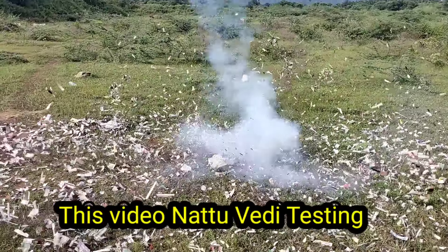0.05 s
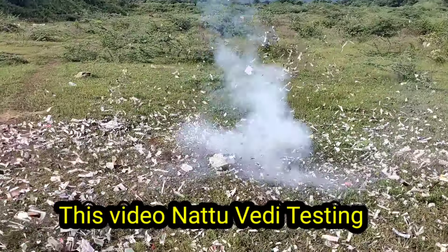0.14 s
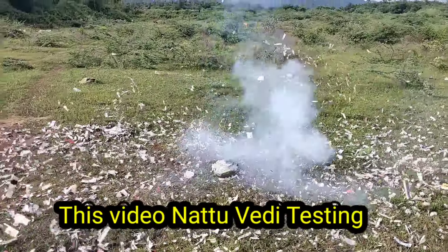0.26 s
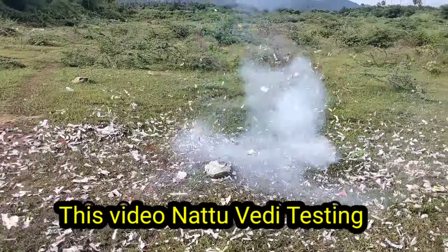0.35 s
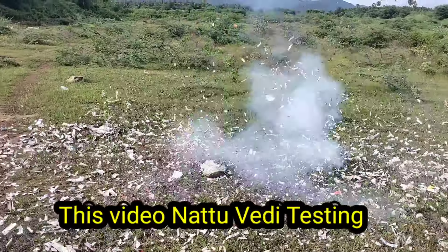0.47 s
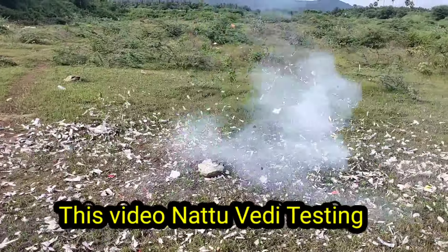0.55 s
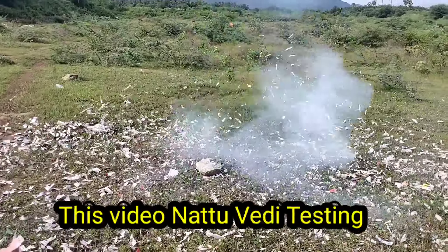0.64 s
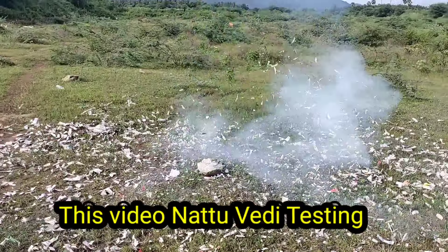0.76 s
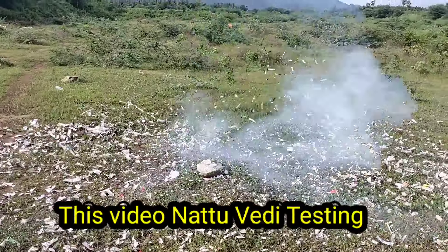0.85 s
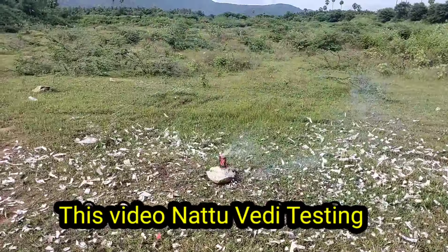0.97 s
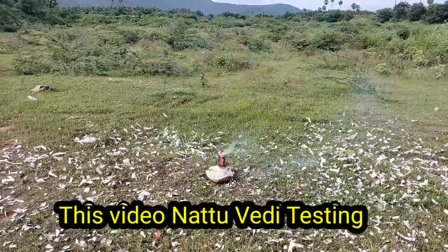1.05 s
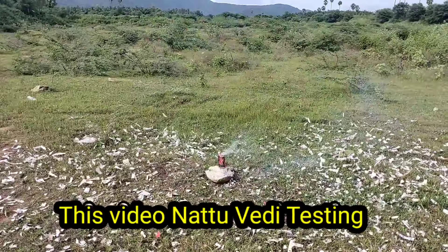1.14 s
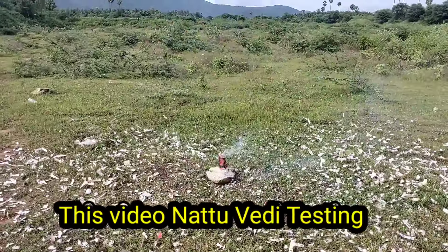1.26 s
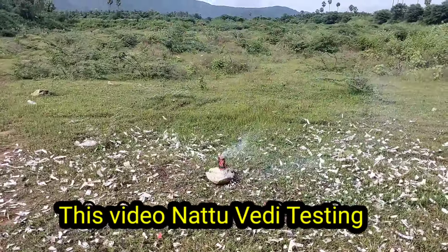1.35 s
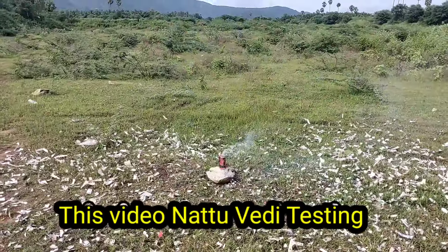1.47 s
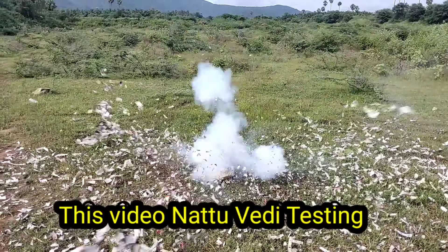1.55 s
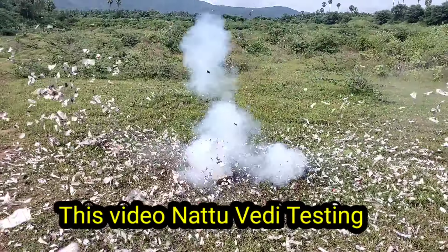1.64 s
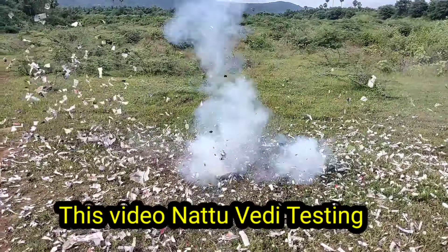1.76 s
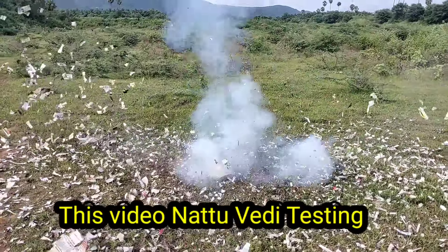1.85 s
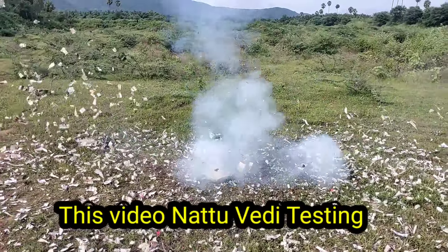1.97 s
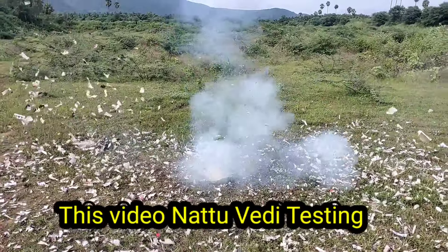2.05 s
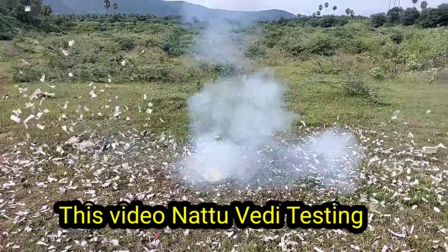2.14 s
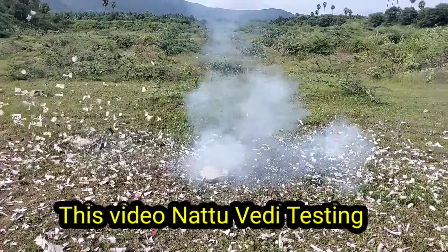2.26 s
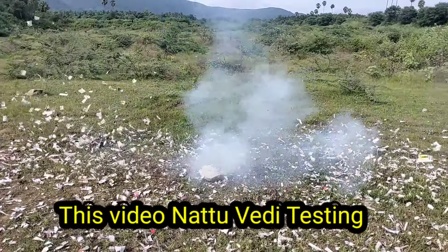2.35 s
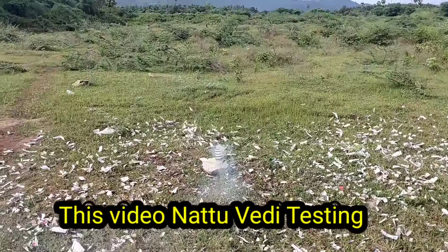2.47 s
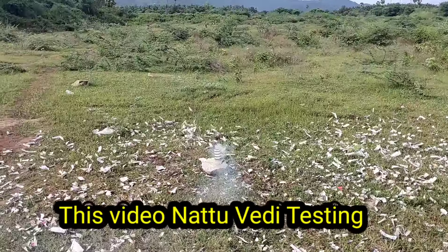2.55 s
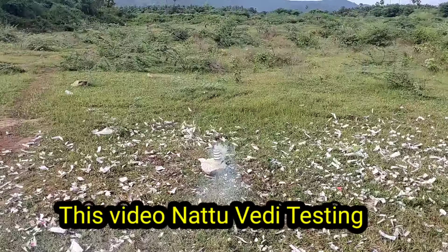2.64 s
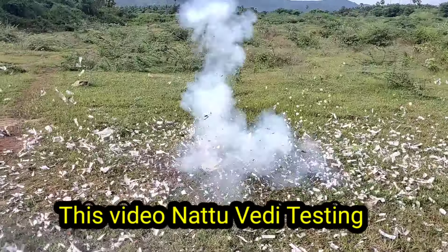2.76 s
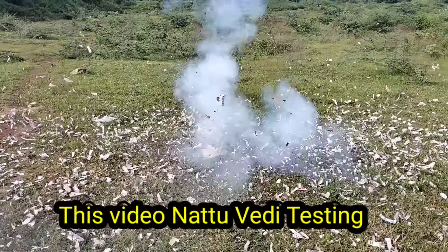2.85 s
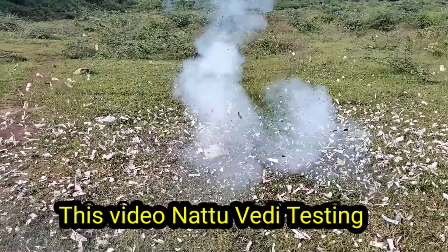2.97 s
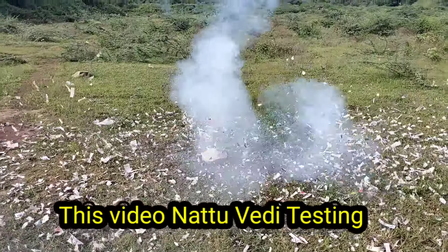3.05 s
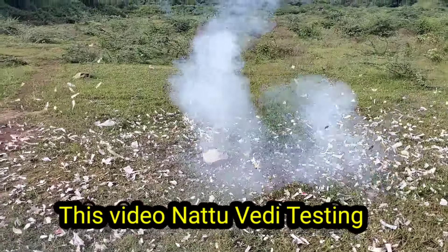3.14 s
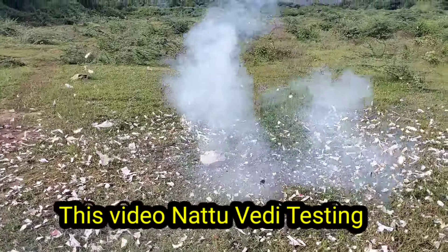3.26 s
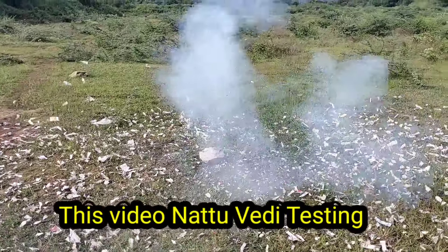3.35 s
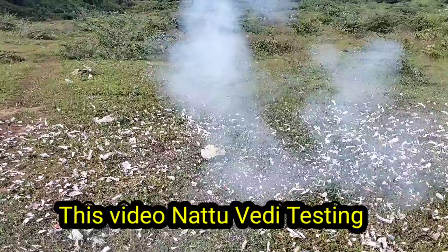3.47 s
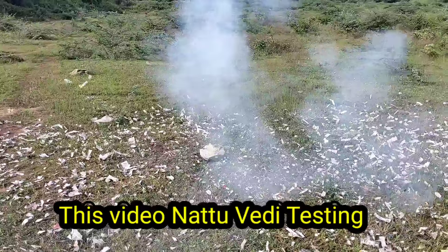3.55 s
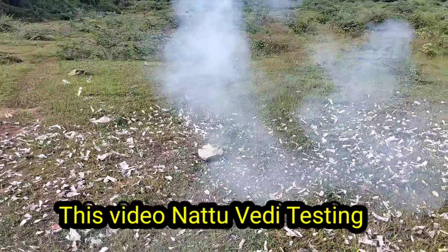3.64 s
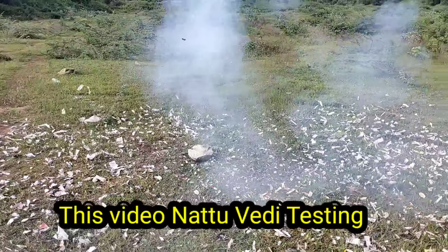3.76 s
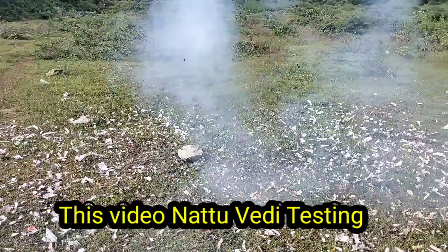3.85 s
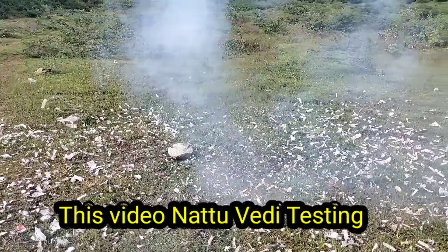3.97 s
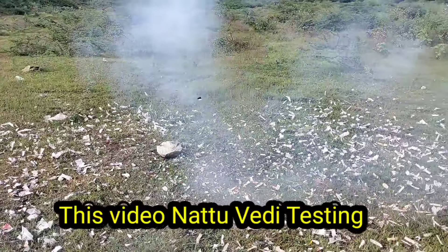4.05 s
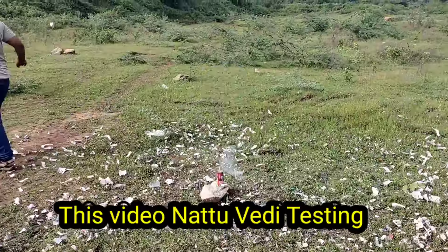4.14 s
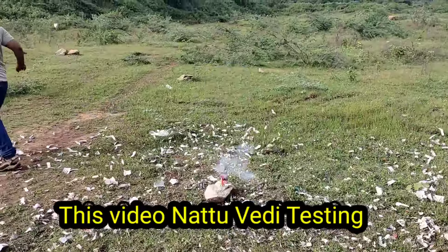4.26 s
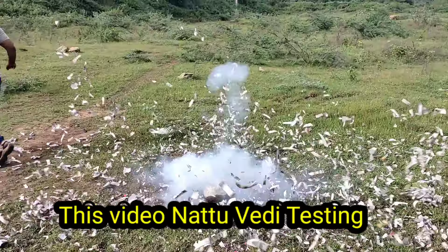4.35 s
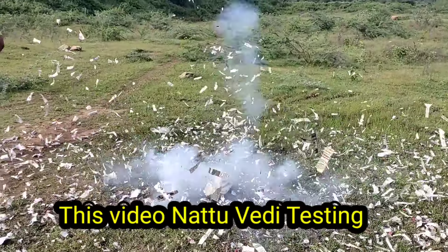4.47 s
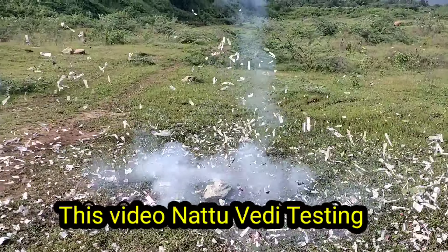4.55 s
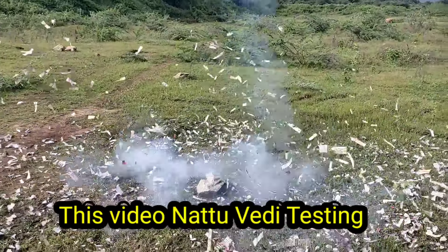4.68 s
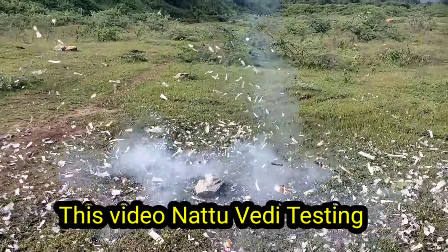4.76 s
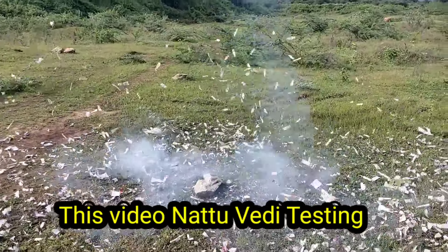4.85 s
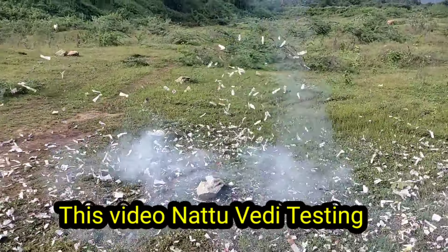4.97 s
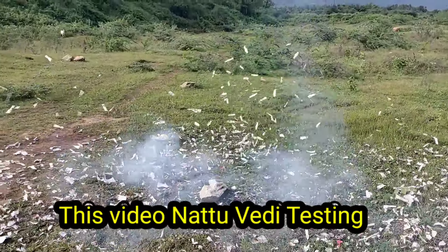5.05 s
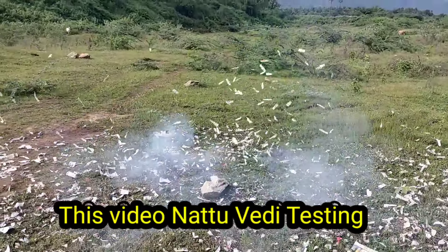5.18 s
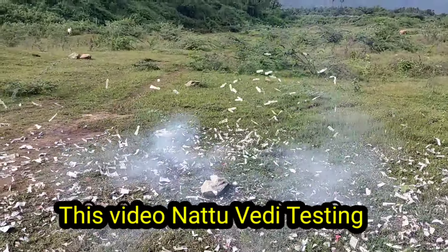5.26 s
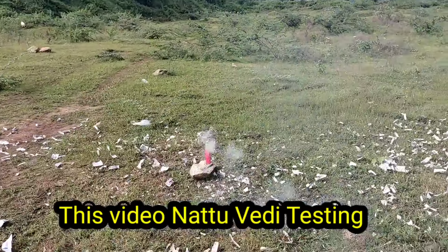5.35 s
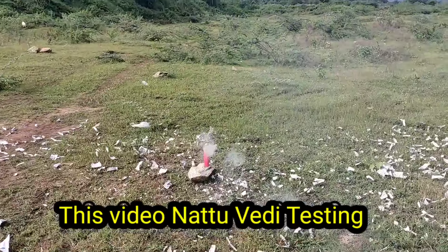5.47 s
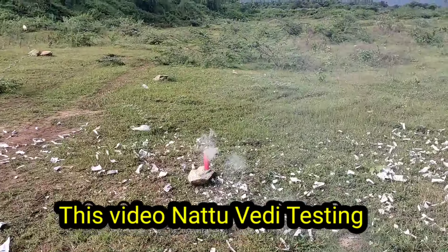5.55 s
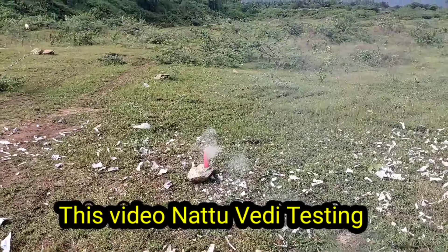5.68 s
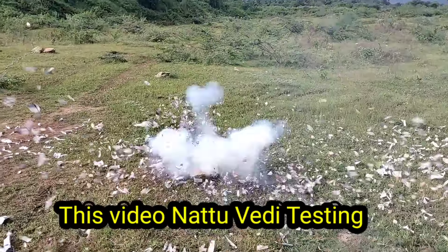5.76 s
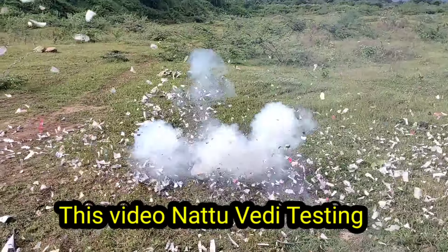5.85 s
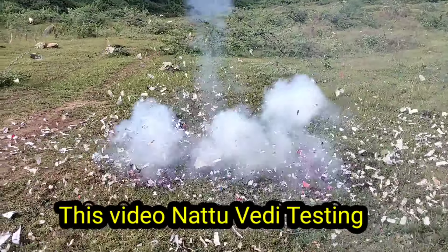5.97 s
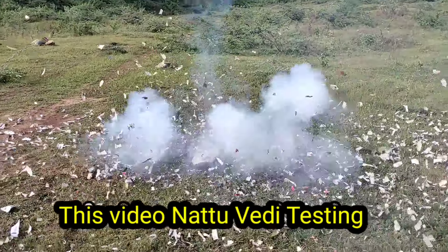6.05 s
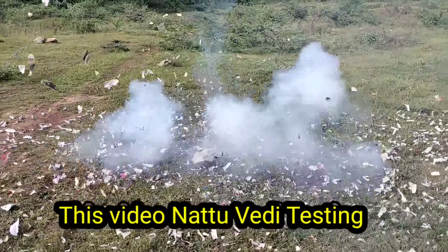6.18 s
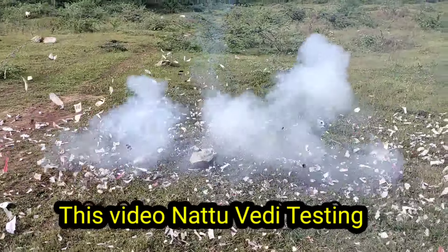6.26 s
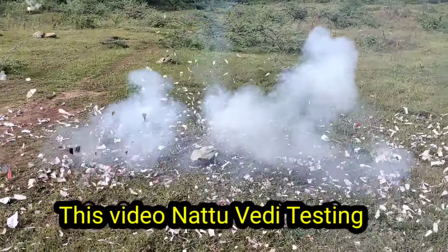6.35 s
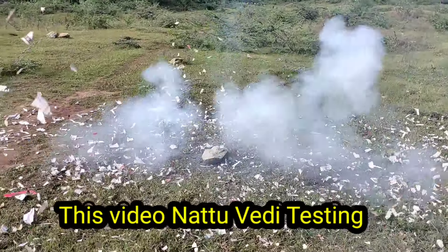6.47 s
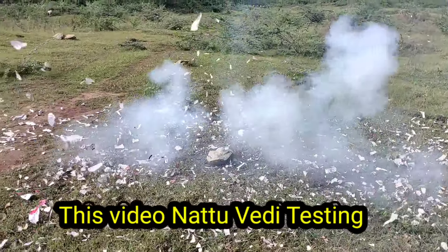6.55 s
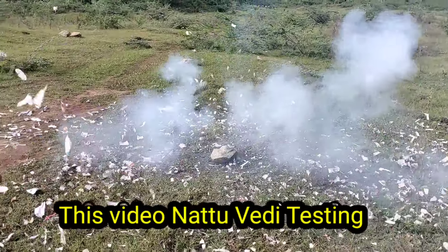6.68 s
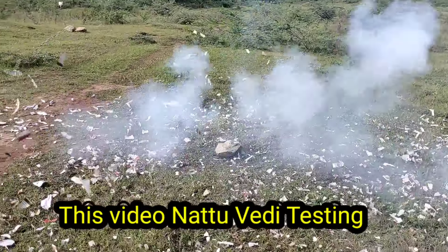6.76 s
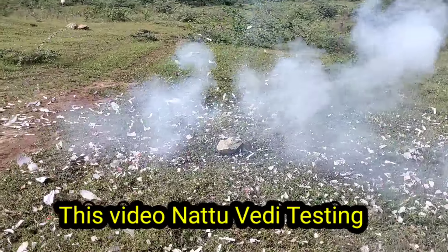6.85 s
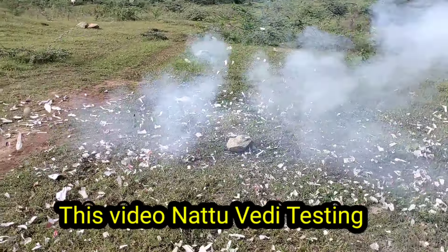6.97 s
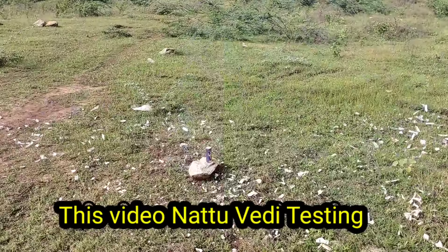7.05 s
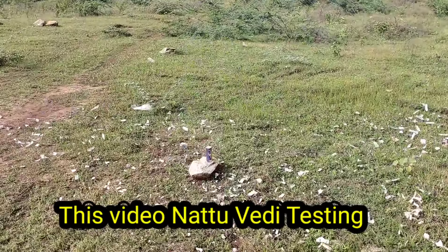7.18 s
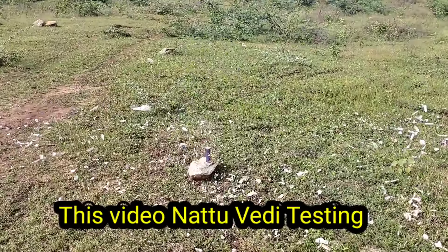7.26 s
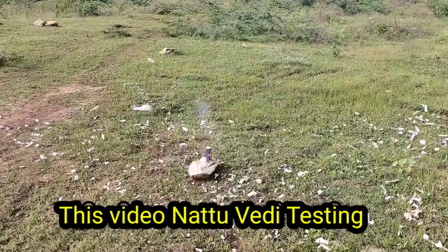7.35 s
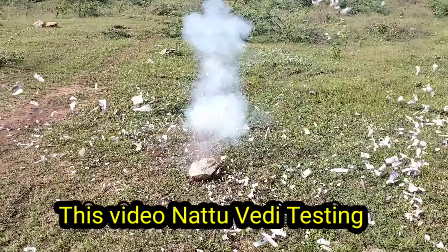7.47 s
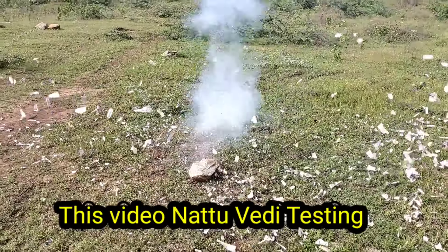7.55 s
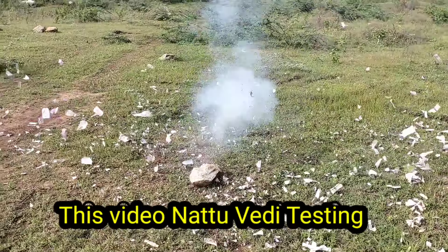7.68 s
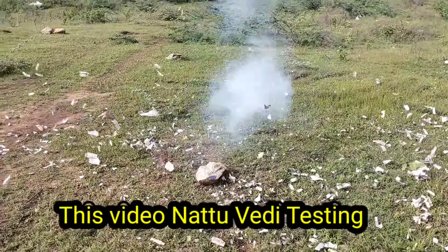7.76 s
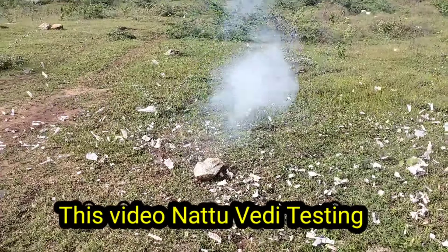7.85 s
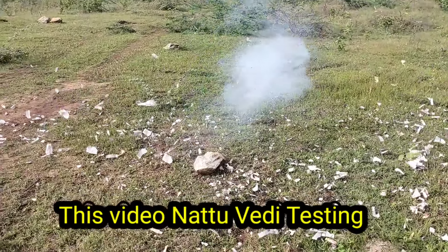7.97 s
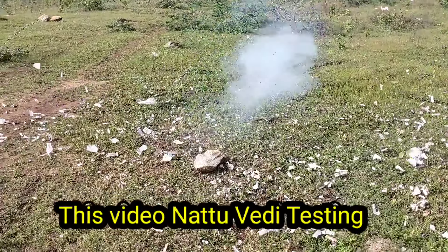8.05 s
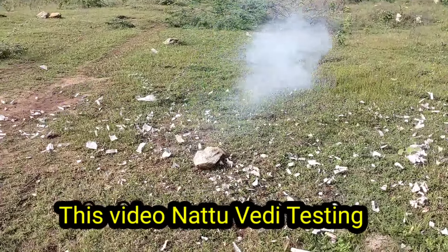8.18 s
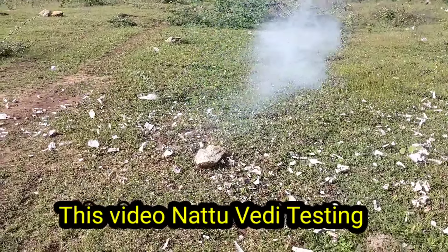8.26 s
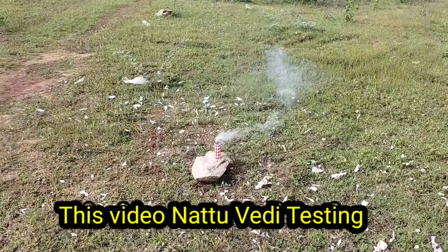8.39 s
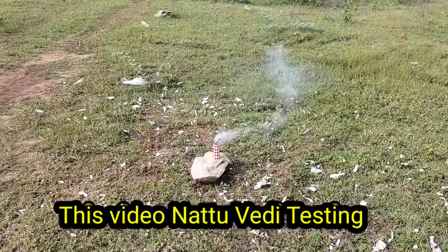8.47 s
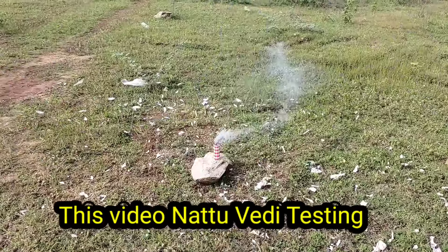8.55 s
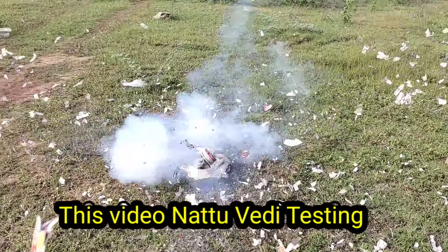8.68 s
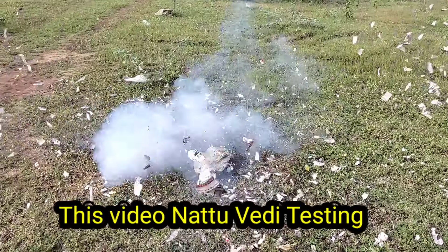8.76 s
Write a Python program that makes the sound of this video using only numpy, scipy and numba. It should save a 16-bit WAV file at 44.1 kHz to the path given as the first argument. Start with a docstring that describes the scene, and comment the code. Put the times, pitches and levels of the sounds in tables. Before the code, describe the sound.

Harsh single firecracker blasts crack and boom outdoors, slapping back from trees and far hills, separated by faint field air, scraps and fuse hiss.

```python
"""A firecracker bang already under way opens the scene; six more follow on the same stone in an open field.
Each blast is a shock pulse, a sinking boom and filtered noise, scattered by ground and bushes, slapped back
by tree lines and rolled out by far hills; it overloads the microphone, and its tail fades early.
The gaps hold noise bands of field air, clicks of landing scraps, gliding bird whistles and insect trills.
A fuse, hissing noise with uneven spits, burns before some bangs."""
import sys
import numpy as np
from scipy import signal
from scipy.fft import rfft, irfft
from scipy.io import wavfile
from scipy.ndimage import uniform_filter1d
from numba import njit

SR = 44100
rng = np.random.default_rng(int(sys.argv[2]) if len(sys.argv) > 2 else 0)


def master(y):
    """Save y as 16-bit WAV."""
    cut = np.clip(np.atleast_2d(y).T, -1, 1)
    pcm = np.round(cut * 32767)  # scale
    wavfile.write(sys.argv[1], SR, pcm.astype(np.int16))


N = 388962

# All source levels are those ahead of the clipping and gain control.
# The bangs: t/s, level/dB, bass/dB, treble/dB, treble change/(dB/s), fade start t/s, fade end t/s,
# peak limit ahead of the microphone colour/1
BANGS = [(-.032, 0.5, 0.5, 3, 0, 1.1234, 1.2377, 0.6), (1.6290, 1.5, 0.5, 2, 1.5, 2.714, 2.716, .48),
         (2.7852, 0, 0.5, 4.5, -4.5, 4.428, 4.434, 0.51), (4.4317, 0.5, -1, 1.5, 1, 5.455, 5.622, 0.63),
         (5.901, 1, 1, 3.5, -15.5, 7.24, 7.325, 0.3), (7.5272, -0.5, -1.5, -0.5, -1, 8.495, 8.6, .62),
         (8.6940, 1, 0, 2.5, -4, 9.64, 9.97, 0.55)]
# Thump, body, crack and sizzle of a blast: from f/Hz, to f/Hz
BLAST_BANDS = [(90, 1230), (480, 1500), (1500, 5160), (5600, 17000)]
# What sends the blast back, in order: fireball and ground under it, bushes close by, tree line, open ground
# behind the trees, far hills, farthest ridges: arrival after the bang t/s, swell t/s, hold t/s,
# extra decay after the hold/(dB/s), (level/dB of each band), (fall/(dB/s) of each band)
REFLECTING_ZONES = [(0, .0005, .026, 530, (-6, 10, 17.5, 6.5), (1, 86, 360, 560)),
                    (.028, .002, .192, 125, (-16, -25, -15.5, -24.5), (50, 86, 70, 82)),
                    (.248, .021, .053, 230, (-23.5, -38.5, -28, -43), (93, 108, 33, 1)),
                    (.297, .039, .173, 400, (-41, -55.5, -39.5, -60), (18, 25, 35, 1)),
                    (.393, .214, .497, 34, (-36, -35, -28.5, -48.5), (18, 11, 30, 50)),
                    (.8, .18, 1, 300, (-46, -52, -52.5, -87), (7, .1, .1, 12))]
# Single reflectors: t/s after the bang, bass pulse level/dB (ahead of a fixed pulse gain) and slap level/dB,
# both relative to the scatter, brightness/dB
ECHOES = [(.052, 5, 0, 13), (.08, -3, 1, -8), (.126, 3, 2, -8), (.149, 2, 7, 0), (.183, 7, 0, 0),
          (.205, -2, 4, 2), (.298, 6, -2, 6), (.401, -5, 9, 1), (.424, 10, -12, 0), (.472, 7, 5, -4),
          (.505, 10, 3, 1), (.558, 12, 5, -3), (.576, -15, 3, 0), (.62, 10, 1, -2), (.648, 13, -2, 1),
          (.687, 5, -2, 1), (.858, 6, 2, 0), (.992, 7, 1, 2)]
# How brightness weighs body, crack and sizzle: share/1
BRIGHT_SHARE = [-1, .1, 1]
# Part of each band's scatter that repeats from bang to bang: power share/1
SAME_GROUND = [.4, .3, .15, 0.092]
# Tone of the blasts: f/Hz, level/dB
BLAST_COLOUR = [(30, 15), (70, -0.5), (230, 2.5), (450, 0.5), (700, 0.5), (1200, -2), (2400, 1), (4000, -3),
                (5500, -4), (9000, -1.5), (15000, 1.5)]
ECHO_SPREAD_S = 0.0044
THUMP_FROM_HZ, THUMP_TO_HZ, THUMP_SINKS_S = 960, 314, 0.15

# Air of the field, one row for each stretch of steady level: from t/s, rumble level/dB, drone level/dB,
# rustle level/dB
FIELD = [(0, -70, -86, -65), (1.42, -67, -76, -65), (1.49, -68, -82, -68), (2.7, -59.5, -76, -75),
         (2.8, -58, -62, -60), (4.45, -70.5, -86, -88.5), (7.2, -79.5, -85.5, -78.5),
         (7.365, -66.5, -64, -59), (8.45, -62, -67, -58)]
# the levels glide between stretches, and the air sinks away just before each bang
LEVEL_GLIDE_S, HUSH_DB, HUSH_S = .02, -9, .06

# Landing scraps, stray cracks in the roar, and one sharp treble echo of a bang: t/s, peak level/dB, f/Hz,
# spread to each side/octave, ring down to -60 dB t/s
TICKS = [(1.1272, -33, 2600, 0.56, 0.013), (1.427, -44, 1105, 1.7, .025), (1.896, -19.5, 6000, 0.77, 0.014),
         (2.609, -52, 11790, 0.35, 0.013), (2.635, -31, 6940, 0.84, .02), (2.641, -28.5, 6000, 1.3, 0.048),
         (2.672, -39, 9940, .8, 0.032), (3.943, -31.5, 2580, 0.73, 0.018), (4.066, -35, 2200, 0.52, 0.022),
         (4.499, -12.5, 2500, 0.79, 0.018), (4.516, -7, 2490, .8, .015), (4.583, -10, 7500, 0.57, 0.058),
         (5.979, -8, 1820, 1.06, 0.019), (6.049, -9, 14450, 0.22, 0.037), (6.949, -44, 14050, 0.21, 0.022),
         (7.11, -50, 4960, 0.53, 0.012), (7.433, -30, 3760, 0.62, 0.018)]

# Bird whistles: t/s, length t/s, from f/Hz, to f/Hz, level/dB
BIRDS = [(1.24, .03, 9300, 8700, -62), (1.485, .03, 9300, 8700, -66), (1.255, .05, 694, 640, -68),
         (1.3, .1, 540, 520, -75), (1.375, .025, 4530, 4450, -65), (1.392, .033, 4750, 4646, -61),
         (1.43, 0.039, 6200, 4010, -60.5), (2.715, .07, 360, 560, -62), (5.701, 0.038, 4280, 4160, -75),
         (5.745, .08, 3220, 2985, -67.5), (5.761, .06, 2850, 2780, -72), (8.622, .032, 4300, 5300, -58),
         (8.647, 0.055, 5300, 5870, -59), (8.65, 0.048, 4700, 4400, -61), (8.577, 0.1, 2650, 2570, -66)]
# Insect trills: t/s, length t/s, f/Hz at the start, beats/(1/s), level/dB
INSECTS = [(1.347, .26, 5750, 35, -66), (5.501, 0.28, 5400, 46, -63)]
BIRD_WAVER, INSECT_WAVER, INSECT_SAG = .012, .017, .03  # share of the pitch

# Burning fuses: lit t/s, goes quiet t/s, level/dB, time to catch t/s
FUSE = [(4.2, 4.43, -40, 0.18), (7.309, 7.478, -39.5, 0.072), (8.517, 8.69, -57, 0.06)]
# Spectrum of the hiss: f/Hz, relative density level/dB
FUSE_COLOUR = [(300, -37.5), (1500, -16), (2200, -10.5), (3000, -10), (3800, -2.5), (4500, -12),
               (6800, -21.5), (10500, -11), (15000, -8)]
CATCH_DB, QUIET_DB = -29, -11.5  # relative to full burn: when lit, and in the last moment before the bang

# Tone of the microphone capsule: f/Hz, level/dB
MICROPHONE = [(25, -17), (80, -10), (180, 0.5), (5000, -1), (7200, -7), (9000, 1), (15000, -2.5)]
CEILING, CALM = 0.61, 0.18  # input clipping amplitude, and level above which the gain comes down
ATTACK_S, RELEASE_S = 0.0098, 0.064
TOP_HZ = 15700


def undb(db):
    """Gain of a level in dB."""
    return 10 ** (np.asarray(db) / 20)


def band(x, lo_hz, hi_hz):
    """Band-pass, scaled so that white noise of rms 1 comes out near rms 1."""
    sos = signal.butter(3, [lo_hz, hi_hz], "bandpass", fs=SR, output="sos")
    return signal.sosfilt(sos, x) * np.sqrt(SR / 2 / (hi_hz - lo_hz))


def colour(x, points):
    """Causal minimum-phase filter that follows (f/Hz, level/dB) points."""
    hz, db = np.transpose(points)
    grid = np.maximum(np.arange(1025) * SR / 2048, 1)
    log_gain = np.interp(np.log(grid), np.log(hz), db) * np.log(10) / 20
    # folding the cepstrum forward makes the filter causal
    cepstrum = irfft(log_gain)
    cepstrum[1:1024] *= 2
    cepstrum[1025:] = 0
    impulse = irfft(np.exp(rfft(cepstrum)))
    return signal.fftconvolve(x, impulse)[:len(x)]


def add(out, s, x):
    """Mix x into out from time s on, cutting what falls outside."""
    i = int(round(s * SR))
    x = x[max(-i, 0):max(N - i, 0)]
    out[max(i, 0):max(i, 0) + len(x)] += x


def held(size):
    """Random levels held for size samples and slewed."""
    steps = np.repeat(rng.standard_normal(N // size + 1), size)[:N]
    return uniform_filter1d(steps, size=size)


def lumpy(size, patchy_db):
    """Noise whose level varies in patches of time and pitch, as from many uneven reflectors."""
    z = signal.stft(rng.standard_normal(size), nperseg=1024)[2]
    patches = uniform_filter1d(rng.standard_normal(z.shape), size=3, axis=0)
    patches = uniform_filter1d(patches, size=3, axis=1)
    patchy = z * undb(patchy_db * patches / patches.std())
    x = signal.istft(patchy, nperseg=1024)[1][:size]
    return x / x.std()


@njit
def sink(x, hz):
    """State-variable low-pass whose corner moves."""
    y, b, l = np.empty(len(x)), 0., 0.
    for i in range(len(x)):
        g = np.tan(np.pi * hz[i] / SR)
        v = (b + g * (x[i] - l)) / (1 + g * (g + 1.2))
        y[i] = l + g * v
        b, l = 2 * v - b, 2 * y[i] - l
    return y


@njit
def follow(x, attack, release, e):
    """Envelope that starts at e, rises fast and falls slowly."""
    out = np.empty(len(x))
    for i in range(len(x)):
        e += (abs(x[i]) - e) * (attack if abs(x[i]) > e else release)
        out[i] = e
    return out


def landscape(lag):
    """Scatter power of each band over the lag after a blast, and the bass pulses of single reflectors."""
    power = 1e-12
    for arrives, swells, lasts, dies_db, levels_db, falls_db in REFLECTING_ZONES:
        since = lag - arrives
        db = np.array(levels_db)[:, None] - np.outer(falls_db, since)
        db = db - dies_db * np.maximum(since - lasts, 0)
        swell = np.clip(since / max(swells, 1 / SR), 0, 1) ** 2
        power = power + undb(2 * db) * swell
    smooth, pulses = power.copy(), np.zeros_like(power)
    for s, pulse_db, db, bright_db in ECHOES:
        i = int(s * SR)
        slap_db = db + bright_db * np.array(BRIGHT_SHARE)
        size = np.sqrt(smooth[:, i]) * undb([pulse_db, *slap_db])
        # a slap swells quickly and smears out
        u = np.maximum(lag - s + ECHO_SPREAD_S, 0) / ECHO_SPREAD_S
        power[1:] += size[1:, None] ** 2 * (u * np.exp(1 - u)) ** 3
        # in the bass a slap is shorter than a cycle: one pressure pulse
        pulses[0, i] = size[0] * 12
    return power, pulses


def bangs():
    """Shock pulse and scattered noise: each blast meets the same landscape, over partly the same ground."""
    out, lag = np.zeros(N), np.arange(int(1.7 * SR)) / SR
    power, pulses = landscape(lag)
    ground = [lumpy(len(lag), 2.4) for _ in BLAST_BANDS]
    # pressure jumps up, then falls in a straight line through zero to suction
    shock = np.where(lag < .0012, 1 - lag / .0006, 0) * undb(16.5)
    # soft ground soaks up the top of the boom first, so it sinks in pitch
    boom_hz = THUMP_TO_HZ + (THUMP_FROM_HZ - THUMP_TO_HZ) * np.exp(-lag / THUMP_SINKS_S)
    for s, db, bass_db, treble_db, change_db, start, end, _ in BANGS:
        tilt = [bass_db, 0, treble_db / 2 + change_db * lag / 4, treble_db + change_db * lag]
        parts = []
        for k, (lo, hi) in enumerate(BLAST_BANDS):
            same = np.clip(SAME_GROUND[k], 0, 1)
            grain = np.sqrt(same) * ground[k] + np.sqrt(1 - same) * lumpy(len(lag), 3.)
            scatter = grain * np.sqrt(power[k]) + pulses[k]
            parts.append(undb(tilt[k]) * band(scatter, lo, hi))
        boom = undb(3) * sink(sink(parts[0], boom_hz), boom_hz)
        blast = shock + boom + sum(parts[1:])
        fade = np.clip((end - s - lag) / (end - start), 0, 1) ** 1.5
        add(out, s, blast * undb(db) * fade)
    return colour(out, BLAST_COLOUR)


def field():
    """Low rumble, far drone and patchy rustle of grass: uneven noise in three steep bands."""
    s, *levels_db = np.transpose(FIELD)
    t, bang_s = np.arange(N) / SR, np.transpose(BANGS)[0]
    next_bang = np.append(bang_s, np.inf)[np.searchsorted(bang_s, t)]
    hush = undb(HUSH_DB * np.clip(1 - (next_bang - t) / HUSH_S, 0, 1))
    stretch = np.maximum(np.searchsorted(s, t, side="right") - 1, 0)
    out = 0
    for (lo, hi), db in zip([(25, 310), (360, 1300), (1350, 2750)], levels_db):
        air = band(band(lumpy(N, 4.3), lo, hi), lo, hi)
        steady_db = uniform_filter1d(db[stretch], int(LEVEL_GLIDE_S * SR))
        out = out + air / air.std() * undb(steady_db + 2.6 * held(size=1100))
    return out * hush


def ticks():
    """Short dry clicks: dying noise bursts, each in a band around its pitch."""
    out, t = np.zeros(N), np.arange(int(.05 * SR)) / SR
    for s, db, hz, octaves, ring in TICKS:
        burst = rng.standard_normal(len(t)) * np.exp(-np.log(1000) * t / ring)
        click = band(burst, hz / 2 ** octaves, min(hz * 2 ** octaves, SR / 2.5))
        add(out, s, undb(db) * click / np.abs(click).max())
    return out


def whistle(length, from_hz, to_hz, waver):
    """Sine that glides and wavers in pitch, swelling and fading once."""
    t = np.arange(int(length * SR)) / SR
    wobble = 1 + waver * np.repeat(rng.standard_normal(400), 60)[:len(t)]
    hz = (from_hz + (to_hz - from_hz) * t / length) * wobble
    return np.sin(2 * np.pi * np.cumsum(hz) / SR) * np.sin(np.pi * t / length)


def birds():
    """Faint bird calls: single whistles that glide in pitch."""
    out = np.zeros(N)
    for s, length, from_hz, to_hz, db in BIRDS:
        add(out, s, undb(db) * whistle(length, from_hz, to_hz, BIRD_WAVER))
    return out


def insects():
    """Raspy trills: a wavering, slightly sagging tone chopped into regular beats."""
    out = np.zeros(N)
    for s, length, hz, beats, db in INSECTS:
        tone = whistle(length, hz, hz * (1 - INSECT_SAG), INSECT_WAVER)
        t = np.arange(len(tone)) / SR
        add(out, s, undb(db) * tone * np.abs(np.cos(np.pi * beats * t)))
    return out


def fuse():
    """Burning powder: a hiss of dense sparks that catches, spits unevenly and sinks into the charge."""
    spits = undb(2.5 * held(size=150))
    hiss = colour(rng.standard_normal(N) * spits, FUSE_COLOUR)
    t, gain, bang_s = np.arange(N) / SR, 0, np.transpose(BANGS)[0]
    for lit, quiet, db, catches in FUSE:
        burns = (t > lit) & (t < bang_s[bang_s > lit][0])
        catch_db = CATCH_DB * np.clip(1 - (t - lit) / catches, 0, 1)
        quiet_db = QUIET_DB * np.clip((t - quiet) / .012, 0, 1)
        gain = gain + burns * undb(db + catch_db + quiet_db)
    return gain * hiss / hiss.std()


def scene():
    """All sources at the single microphone."""
    return (bangs() + field() + ticks() + birds() + insects() + fuse())[None]


def record(dry):
    """The input clips, gain control pulls the flat tops down within milliseconds, the capsule colours it."""
    clipped = np.clip(dry[0], -CEILING, CEILING)
    # the envelope starts high: the first blast is already under way
    loud = follow(clipped, 1 / (ATTACK_S * SR), 1 / (RELEASE_S * SR), CEILING)
    calmed = clipped * CALM / np.maximum(loud, CALM)
    # each bang, with the gap after it, has its own peak limit
    s, peak = np.transpose(BANGS)[[0, -1]]
    top = peak[np.searchsorted(s, np.arange(N) / SR) - 1]
    coloured = colour(np.clip(calmed, -top, top), MICROPHONE)
    # steep low-pass: nothing much is heard above TOP_HZ
    lowpass = signal.ellip(8, .2, 70, TOP_HZ, fs=SR, output="sos")
    return signal.sosfilt(lowpass, coloured)[None]


dry = scene()
out = record(dry)
master(out)
```